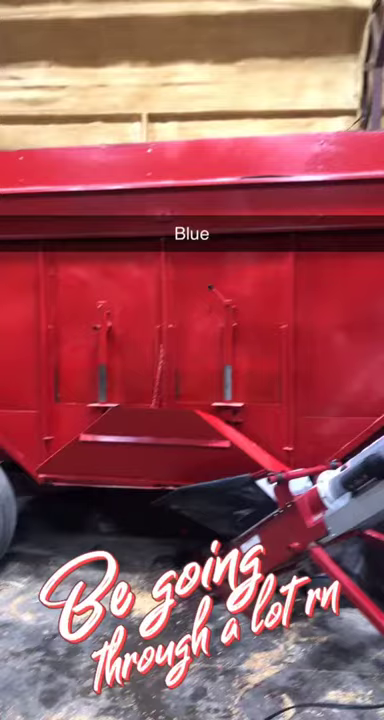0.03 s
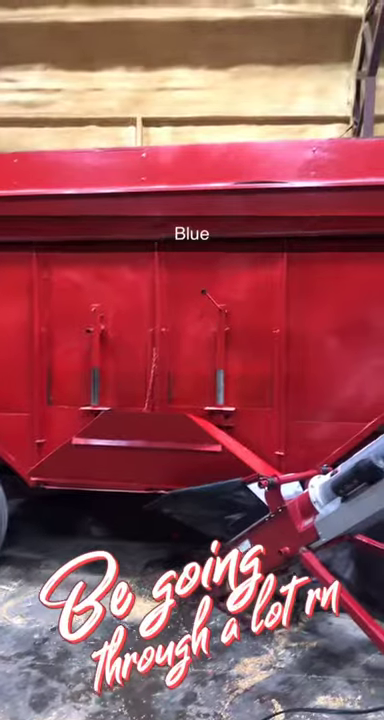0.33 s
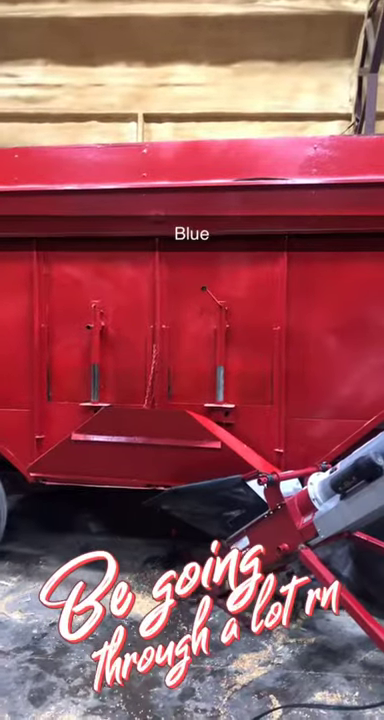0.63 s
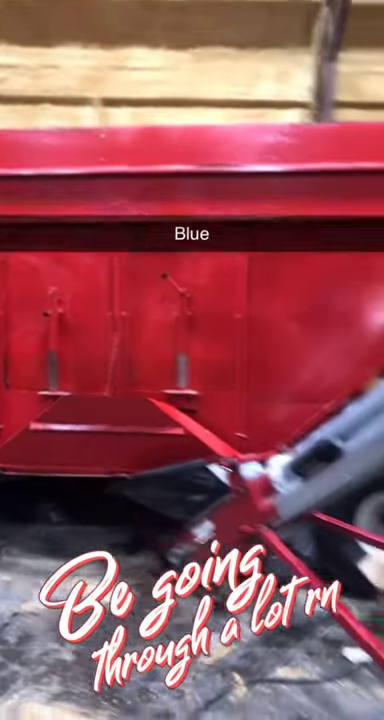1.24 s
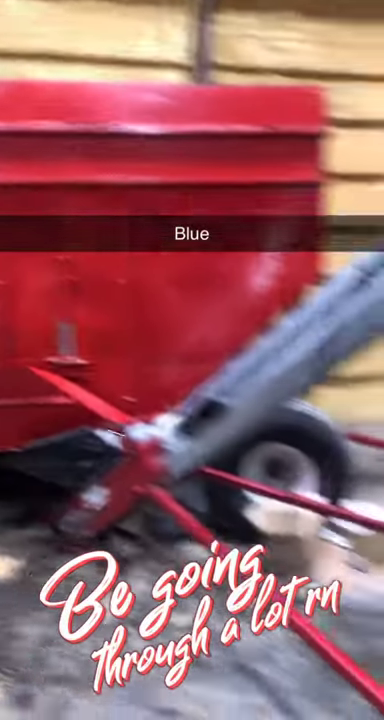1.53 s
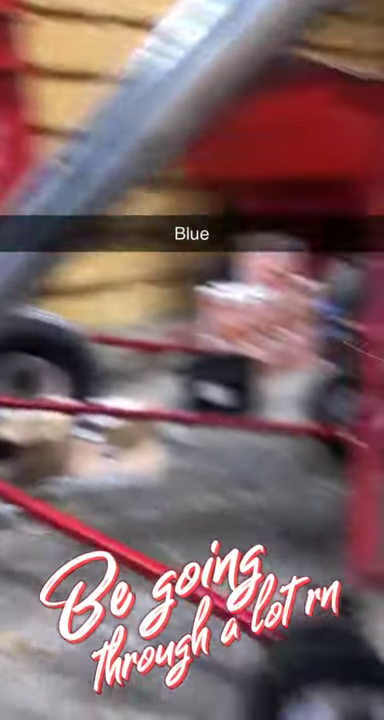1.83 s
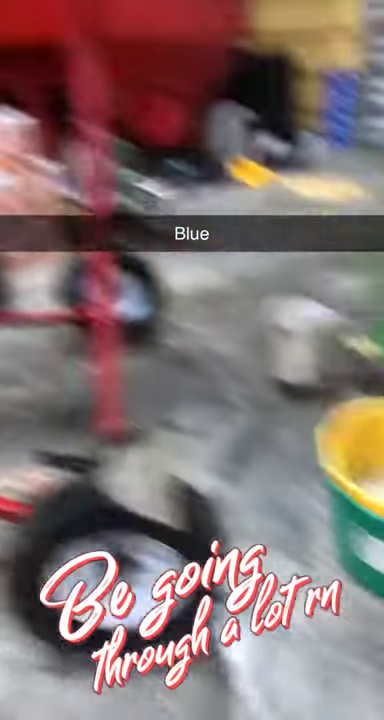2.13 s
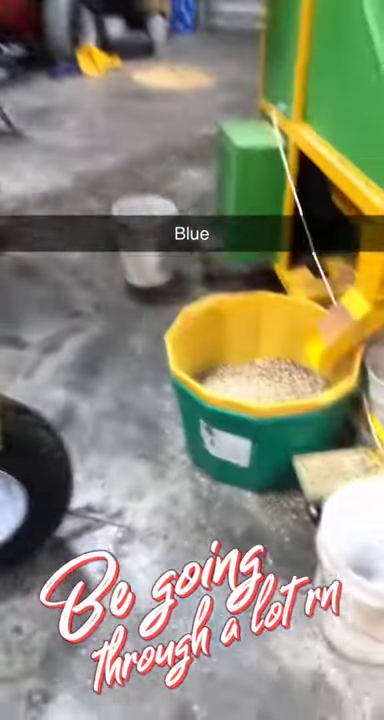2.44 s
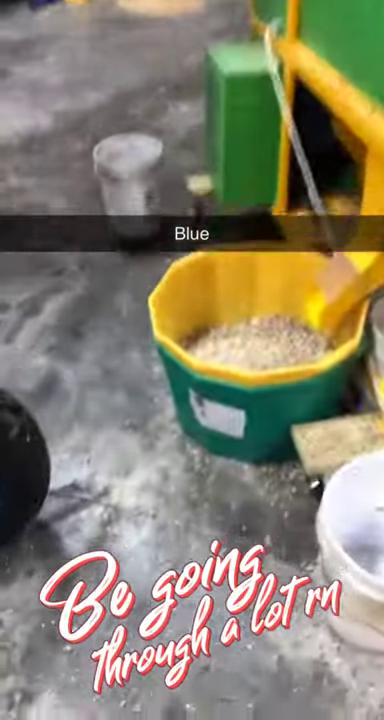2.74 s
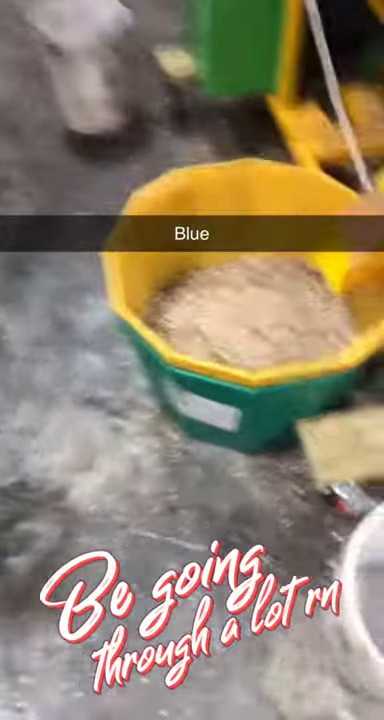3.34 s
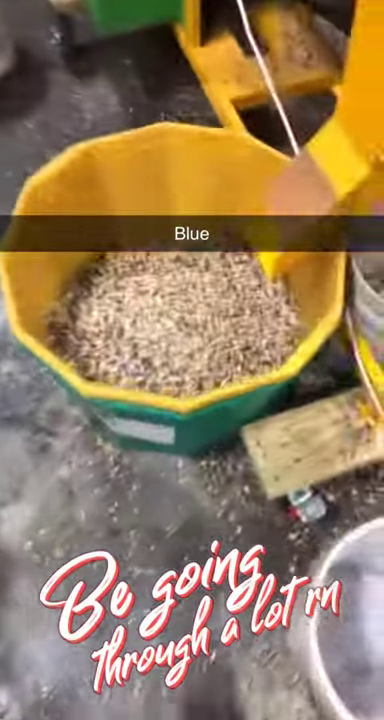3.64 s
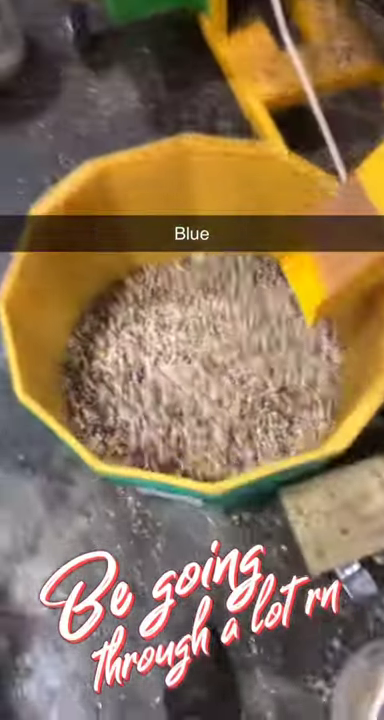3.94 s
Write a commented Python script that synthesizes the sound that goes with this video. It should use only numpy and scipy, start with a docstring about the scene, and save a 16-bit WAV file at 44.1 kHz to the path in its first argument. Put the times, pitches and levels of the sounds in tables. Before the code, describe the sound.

Grain rushes loudly through an auger in a barn, over rumbling sheet metal and humming motors. As the microphone moves to a grain cleaner, a fan's throb grows, sieves ring and grain hisses brightly into a tub.

```python
"""After a blink of silence, a loud rush cuts in: grain running through the tube of an auger (a screw
conveyor) in a barn. Sheet metal rumbles, electric motors hum and an unbalanced fan throbs.
As the microphone walks over to a grain cleaner, the throb grows, kernels set the sieves ringing,
and the bright hiss of grain pouring into a tub comes near."""
import sys
import numpy as np
from scipy import signal
from scipy.fft import rfft, irfft
from scipy.io import wavfile
from scipy.ndimage import uniform_filter1d, minimum_filter1d

SR = 44100
rng = np.random.default_rng(int(sys.argv[2]) if len(sys.argv) > 2 else 0)


def bounce(signal):
    """Save signal as a 16-bit WAV file at the path given by the first command-line argument."""
    frames = np.transpose(np.atleast_2d(signal))
    limited = np.clip(frames, -1, 1)
    pcm = np.round(limited * 32767).astype(np.int16)
    wavfile.write(sys.argv[1], SR, pcm)


N = 176400
TIME = np.arange(N) / SR
FREQS = np.fft.rfftfreq(N, 1 / SR)


def amp(db):
    """Turns decibels into a gain."""
    return 10 ** (np.asarray(db) / 20)


def unit(x):
    """Scales a signal to an average strength (rms) of 1."""
    return x / np.sqrt(np.mean(x ** 2) + 1e-20)


def curve(points):
    """Joins (time, value) points with straight lines."""
    return np.interp(TIME, *np.transpose(points))


def colour(x, spectrum, extra_db=0):
    """Sets the balance of low and high frequencies; the result has strength 1."""
    hz, db = np.transpose(spectrum)
    gain = amp(np.interp(np.log(FREQS + 1), np.log(hz), db) + extra_db)
    return unit(irfft(rfft(x) * gain, N))


def noise(gain):
    """Noise of strength 1, shaped by a gain for each frequency."""
    return unit(irfft(rfft(rng.standard_normal(N)) * gain, N))


def drift(rate_hz):
    """A random wobble, up to about the given rate."""
    return noise(np.exp(-(FREQS / rate_hz) ** 2) * (FREQS > 0))


def nearness():
    """How far the walk has come: 0 at the auger, 1 at the cleaner."""
    # the walk: t/s, the cleaner's share of the sound
    walk = [(0, 0.07), (1.4, 0.18), (2, 0.07), (2.7, 0.78), (3.4, 0.93), (4, 1)]
    return curve(walk)


def crossfade(auger, cleaner):
    """One machine gives way to the other at equal power."""
    return np.sqrt(1 - nearness()) * auger + np.sqrt(nearness()) * cleaner


def tone(hz, db):
    """A tone swells and fades as the microphone crosses the barn's standing waves (loud and quiet spots)."""
    depth, rate_hz = 0.38, 0.81
    fading = 1 + depth * (drift(rate_hz) + 1j * drift(rate_hz)) / np.sqrt(2)
    wave = np.exp(2j * np.pi * (hz * TIME + rng.random()))
    return amp(db) * unit((fading * wave).real)


def reflections(x):
    """Echoes slowly lift some frequencies and lower others as the microphone moves."""
    depth_db, patch_hz, patch_s = 0.94, 300, 0.45
    slices = signal.stft(x, nperseg=1024, noverlap=768)[2]
    bands, frames = slices.shape
    patches = uniform_filter1d(rng.standard_normal(slices.shape), round(patch_hz * 2 * bands / SR), axis=0)
    patches = unit(uniform_filter1d(patches, round(patch_s * frames * SR / N), axis=1))
    return signal.istft(slices * amp(depth_db * patches), nperseg=1024, noverlap=768)[1][:N]


def fan(shaft_angle):
    """The unbalanced fan throbs at the first few multiples of its turning speed."""
    # parts of the throb: multiple of the shaft speed, relative level/dB
    harmonics = [(1, -17), (2, -0.5), (3, -11.5)]
    # the throb grows: t/s, level/dB
    throb_level = [(0, -27.5), (1.45, -24.5), (2, -22.5), (2.6, -20.5), (3.2, -18), (3.85, -15.5), (4, -16)]
    throb = sum(amp(db) * np.cos(k * shaft_angle + 2 * np.pi * rng.random()) for k, db in harmonics)
    return np.sqrt(2) * amp(curve(throb_level)) * throb


def motors():
    """The motors' magnetism makes a low hum with a thin buzz on top."""
    # loudness of the hum: t/s, level/dB
    hum_level = [(0, -21.5), (.55, -21), (1.3, -22), (1.95, -18.5), (2.5, -20), (3.15, -19), (3.6, -24),
                 (4, -25)]
    # the buzz: multiple of the hum's frequency, level/dB
    overtones = [(2, -36.5), (3, -41), (4, -36), (5, -41), (6, -42.5), (8, -41.5), (9, -43), (10, -43),
                 (11, -42), (14, -45), (16, -45)]
    hum_hz = 120
    hum = np.sqrt(2) * amp(curve(hum_level)) * np.sin(2 * np.pi * (hum_hz * TIME + rng.random()))
    return hum + sum(tone(hum_hz * k, db) for k, db in overtones)


def housings(shaft_angle):
    """Sheet metal rumbles, shaken at each turn of the shaft, and drones at steady pitches."""
    # rumble of each machine's casing: f/Hz, relative level/dB
    auger_rumble = [(15, -25), (35, -19), (70, -9), (100, -9), (135, 1), (165, -0.5), (220, -2.5),
                    (270, -0.5), (320, 1), (375, -3), (430, -5.5), (520, -8), (700, -13), (1200, -25),
                    (3000, -60)]
    cleaner_rumble = [(15, -17), (35, -11), (70, -9), (100, -7), (135, -3), (165, 0), (220, 0), (270, -1),
                      (320, 1.6), (370, 2.3), (430, -5.5), (520, -5), (700, -16), (1200, -30), (3000, -60)]
    # loudness of the rumble: t/s, level/dB
    rumble_level = [(0, -22.5), (.6, -19), (1.1, -21.5), (1.47, -22), (1.6, -17), (1.85, -20), (2.4, -18),
                    (2.9, -20.5), (3.3, -17), (3.7, -17.5), (4, -17.5)]
    # vibrations of drive and frame: f/Hz, level/dB at the auger, level/dB at the cleaner
    frame_tones = [(114.7, -29, -41), (143.8, -27.5, -34), (167, -34, -33), (171.9, -31.5, -40),
                   (208.5, -39, -32), (231, -41, -35.5), (259.8, -35, -37.5), (302, -34, -33.5),
                   (313.5, -38.5, -33.5), (340, -41, -36), (544, -45, -39.5)]
    shaking = rng.standard_normal((2, N)) * (1 + 0.086 * np.cos(shaft_angle))
    rumble = crossfade(colour(shaking[0], auger_rumble), colour(shaking[1], cleaner_rumble))
    drone = sum(tone(hz, auger_db + (cleaner_db - auger_db) * nearness())
                for hz, auger_db, cleaner_db in frame_tones)
    return amp(curve(rumble_level)) * rumble + drone


def sieves():
    """The stream of kernels keeps the cleaner's metal sieves ringing."""
    # ringing pitches: f/Hz, width/Hz, level/dB at the cleaner
    rings = [(1235, 140, -37), (1690, 62, -36.5), (1955, 92, -43), (2890, 430, -39), (3620, 100, -32.5),
             (4300, 300, -35.5), (5710, 80, -34)]
    ringing = sum(amp(db) * noise(1 / (1 + (2 * (FREQS - hz) / width) ** 2)) for hz, width, db in rings)
    return np.sqrt(nearness()) * ringing


def kernels(spectrum, shaft_angle):
    """Thousands of tiny hits blend with their wash of echoes in the barn."""
    hits_per_s, spread_db, hit_share = 6000, 3, 0.33
    flow_db, ripple_db, ripple_hz = 0.5, 1.7, 35.6
    sizes = amp(spread_db * np.minimum(rng.exponential(1, N), 4))
    hits = unit(sizes * rng.choice([-1, 1], N) * (rng.random(N) < hits_per_s / SR))
    rush = np.sqrt(hit_share) * hits + np.sqrt(1 - hit_share) * rng.standard_normal(N)
    flow = amp(flow_db * drift(rate_hz=25)) * (1 + 0.015 * np.cos(shaft_angle))
    # many close resonances put small peaks and dips in the spectrum
    ripple = unit(uniform_filter1d(rng.standard_normal(len(FREQS)), round(ripple_hz / FREQS[1])))
    return colour(rush * flow, spectrum, ripple_db * ripple)


def grain(shaft_angle):
    """The auger's rush gives way to the cleaner's, joined by the stream falling into the tub."""
    # sound of the grain in each place: f/Hz, relative level/dB
    auger = [(200, -31), (480, -3.5), (760, 4), (950, 0), (1200, 0.5), (1500, 1.5), (1700, 0), (2050, -2),
             (2500, -1.5), (3300, -2), (3700, -0.5), (4000, -3), (4500, 0.3), (5400, -1), (6400, -2.5),
             (7100, -2.5), (7700, 0), (8650, 0.5), (9500, -3), (10400, -4.5), (11600, -8.5), (12400, -11.5),
             (13500, -39)]
    cleaner = [(200, -34), (480, -7.5), (760, 2.5), (1000, 0.6), (1300, -0.5), (1700, -1), (2050, -2.5),
               (2500, -.8), (3300, 1.5), (3700, -.5), (4000, -0.5), (4500, 2.5), (5400, -1.2), (6400, -4.5),
               (7000, -2), (7550, -0.3), (8600, -3.2), (9900, -6.5), (10700, -4.5), (11800, -8),
               (12700, -11), (13600, -21)]
    tub = [(1000, -7), (2500, -5), (4300, -12), (5000, -1.5), (5850, -1.5), (6500, -2.5), (7500, -1),
           (9000, -1), (12000, -18), (13600, -28)]
    # loudness of the rush, and of the pouring as the tub comes near: t/s, level/dB
    rush_level = [(0, -15), (.8, -15), (1.55, -15), (2.05, -16), (2.5, -15.4), (3, -15), (3.5, -15.5),
                  (4, -17)]
    pour_level = [(0, -45), (2.3, -38), (3.15, -26), (3.55, -17.5), (4, -18)]
    rush = amp(curve(rush_level)) * crossfade(kernels(auger, shaft_angle), kernels(cleaner, shaft_angle))
    pour = amp(curve(pour_level)) * kernels(tub, shaft_angle)
    return reflections(rush + pour + sieves())


def scene():
    """Both machines, with one shaft turning the fan and shaking the metal; the same in both ears."""
    shaft_hz = 28.76 * (1 + 0.0013 * drift(rate_hz=2))
    shaft_angle = 2 * np.pi * np.cumsum(shaft_hz) / SR
    mono = grain(shaft_angle) + fan(shaft_angle) + motors() + housings(shaft_angle)
    return np.array([mono, mono])


def record(dry):
    """Turns the loudest peaks down, starts the sound abruptly and cuts the highest treble."""
    ceiling, limiter_s, start_s, cutoff_hz = 0.88, 0.003, 0.1106, 13400
    span = round(limiter_s * SR)
    needed_gain = ceiling / np.maximum(abs(dry).max(0), ceiling)
    gain = uniform_filter1d(minimum_filter1d(needed_gain, span), span)
    lowpass = signal.firwin(301, cutoff_hz, window=("kaiser", 9), fs=SR)
    return signal.oaconvolve(dry * gain * (TIME >= start_s), lowpass[None], "same")


dry = scene()
out = record(dry)
bounce(out)
```